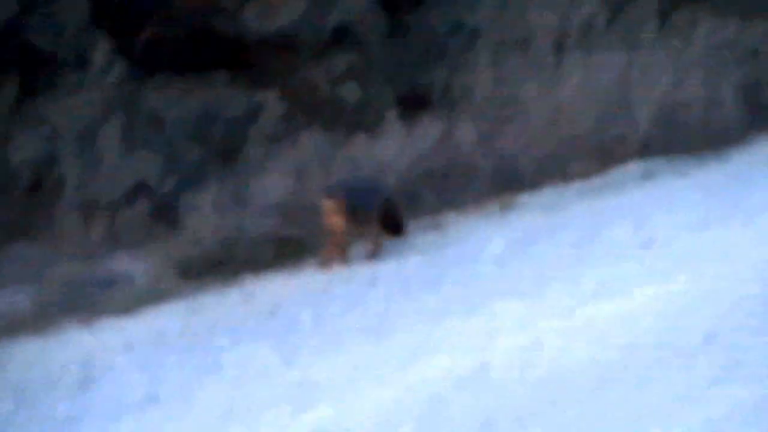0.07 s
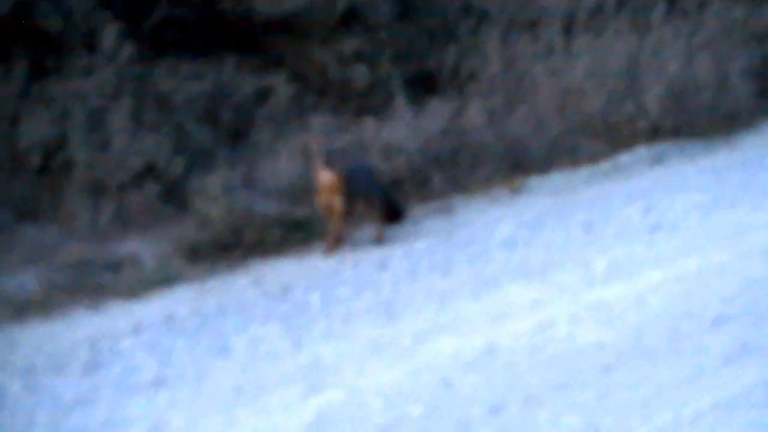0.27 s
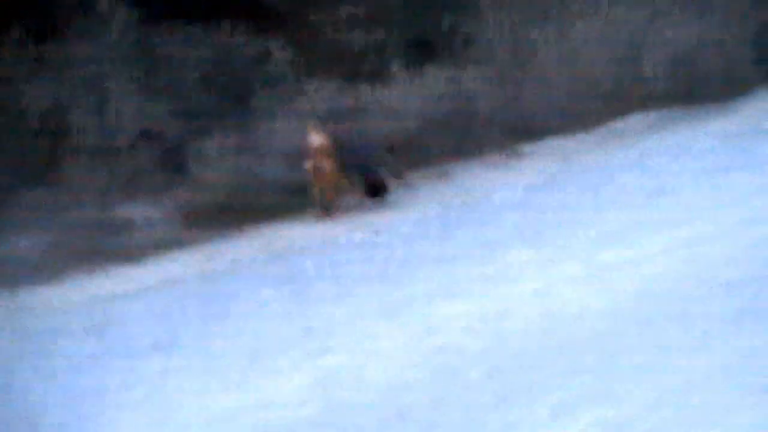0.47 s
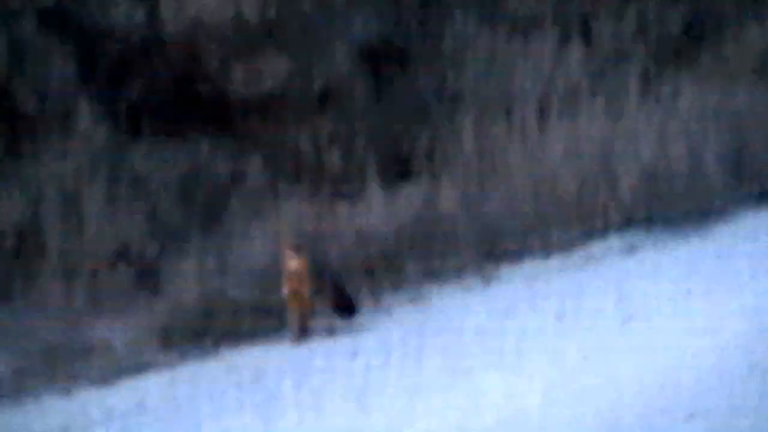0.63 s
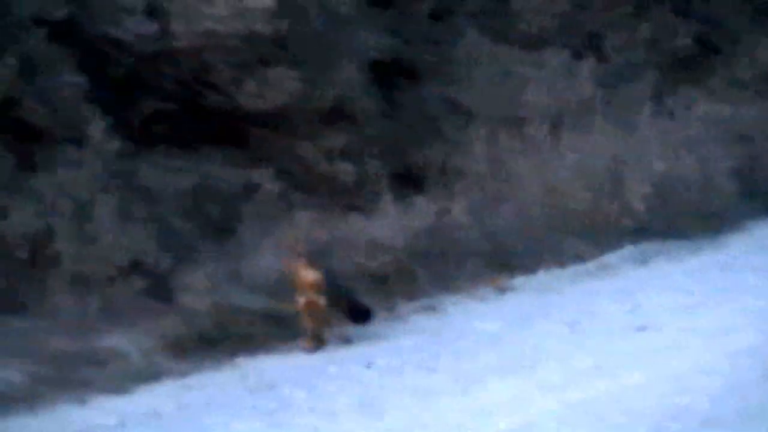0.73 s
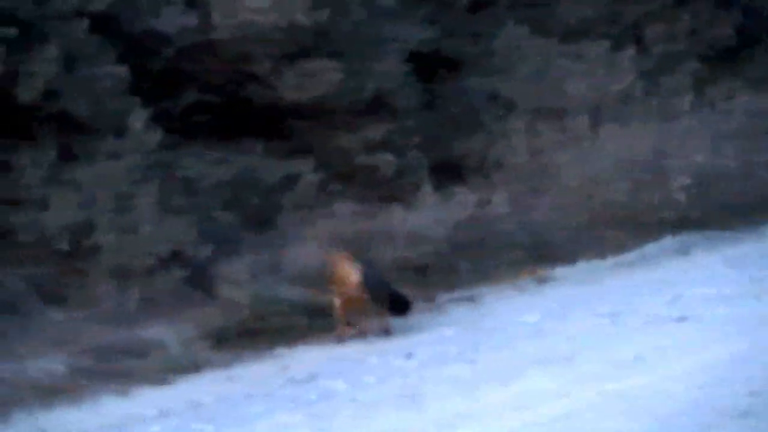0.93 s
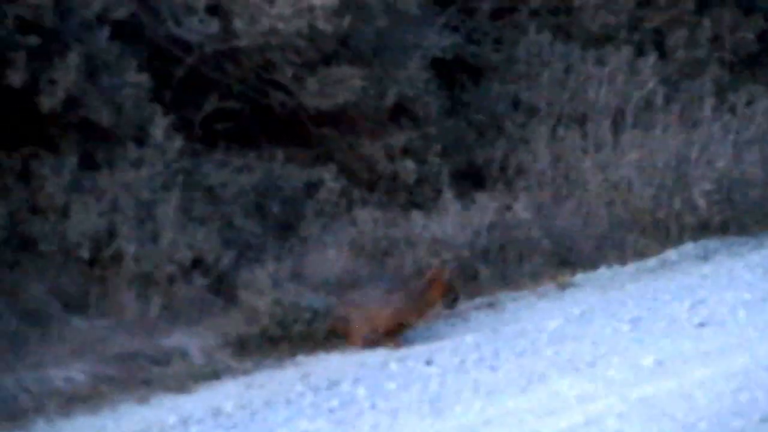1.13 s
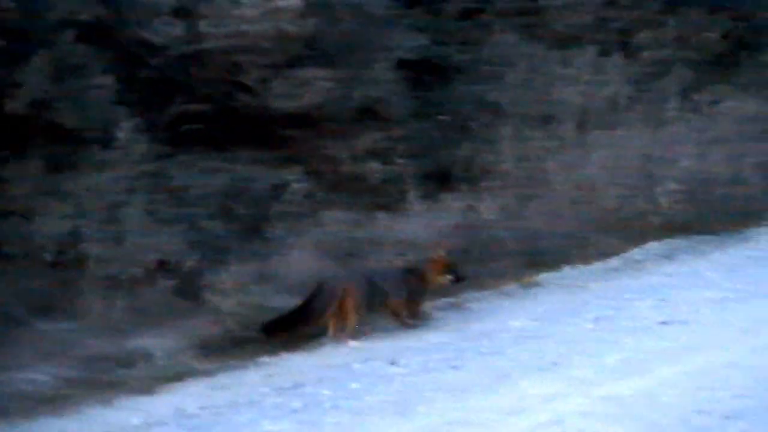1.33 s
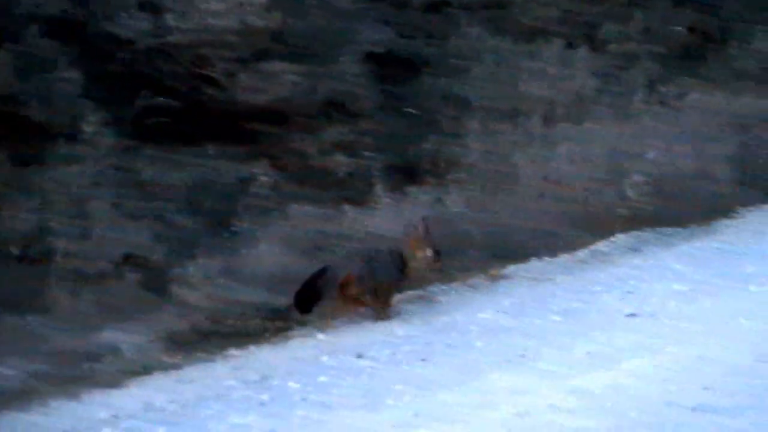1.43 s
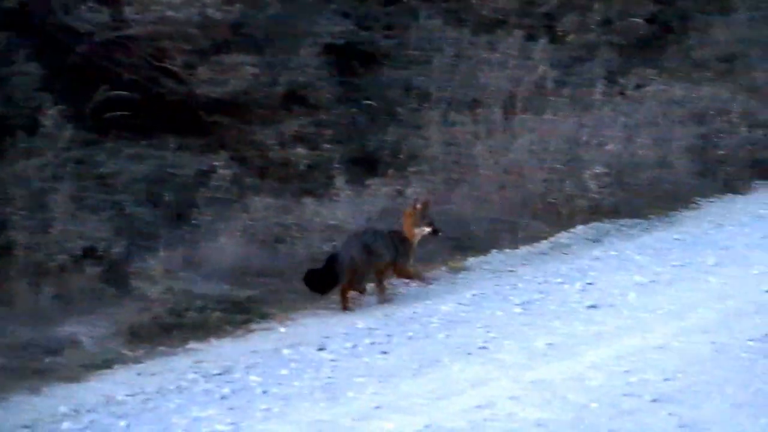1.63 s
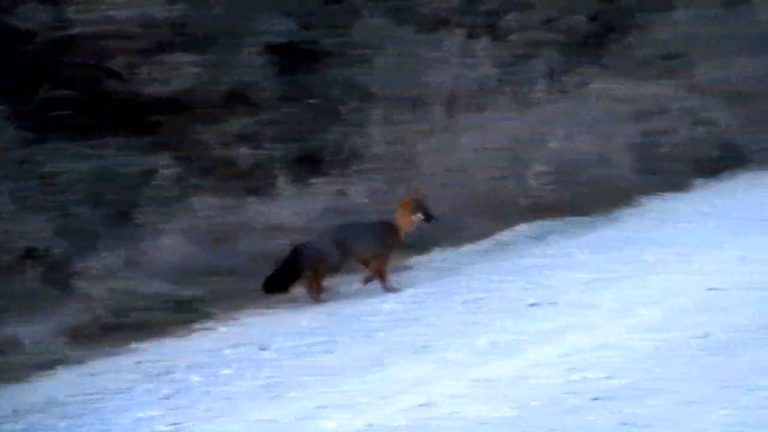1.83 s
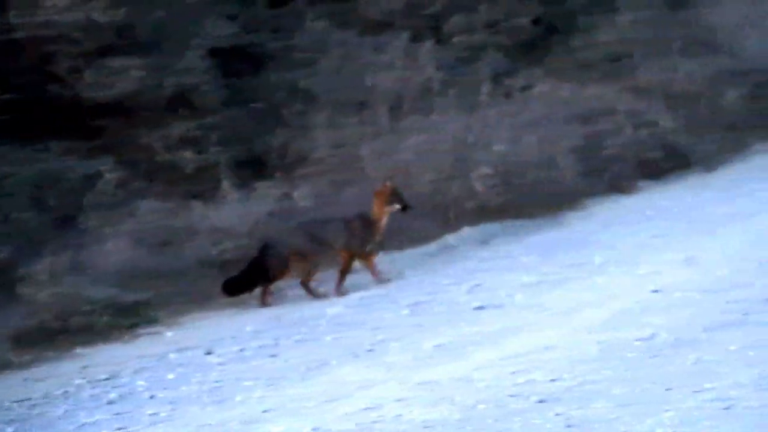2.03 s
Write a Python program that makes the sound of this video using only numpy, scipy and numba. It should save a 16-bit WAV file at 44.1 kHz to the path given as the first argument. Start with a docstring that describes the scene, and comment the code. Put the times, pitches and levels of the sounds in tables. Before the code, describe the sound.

A fox gives one hoarse bark, starting as a crackle at about 0.15 seconds and loudest from 0.25 to 0.45. It ends in a short falling whine near 0.5 seconds, while two soft bumps sound near the microphone. A faint echo fades among the trees. A tiny tick follows at 0.9 seconds and two more soft bumps at about 1.8. A quiet outdoor hiss runs throughout.

```python
"""Over a quiet hiss, a fox gives one hoarse bark at the edge of a snowy wood. It starts as a crackle,
then irregularly flapping vocal folds chop a rush of air, and the throat resonances rise and sink with
the jaw. Near 0.5 s a short falling whine ends it, while two soft bumps sound near the microphone.
The trees return a faint echo; a tiny tick follows at 0.9 s and two more soft bumps at 1.8 s."""
import sys
import numpy as np
from scipy import signal
from scipy.fft import rfft, irfft
from scipy.io import wavfile
from scipy.ndimage import uniform_filter1d, map_coordinates
from numba import njit

SR = 44100
rng = np.random.default_rng(int(sys.argv[2]) if len(sys.argv) > 2 else 0)


def persist_wave(psi):
    """Save psi, clipped to +-1, as 16-bit WAV."""
    counts = np.round(np.clip(psi, -1, 1) * 32767).astype(np.int16)
    wavfile.write(sys.argv[1], SR, np.atleast_2d(counts).T)


N = 92610
TIME_S = np.arange(N) / SR
BINS_HZ = np.fft.rfftfreq(N, 1 / SR)

# Each row: time in seconds, rasp gain in dB, extra treble gain in dB.
BARK_EFFORT = [(.08, -69, -16), (.135, -49.5, -33), (.175, -43, -25.5), (.203, -29.5, -17),
               (.236, -24, -10), (.246, -21, -2.5), (.253, -19.5, -0.5), (.28, -17, -0.5), (.305, -17.5, 0),
               (.345, -20.5, 1.5), (.375, -17.5, -3.5), (.405, -19, -3), (.435, -20.5, -3),
               (.455, -24, -4.5), (.492, -29.5, -1.5), (.513, -49.5, 7.5), (.55, -61, -11.5)]
# Each row: time in seconds, fold pitch in Hz, clear tone gain in dB.
VOCAL_FOLDS = [(.04, 134, -71), (.14, 167.8, -55), (.18, 226.8, -41), (.212, 255.7, -40.5),
               (.248, 298.2, -34), (.28, 306.9, -29), (.305, 311.8, -32.5), (.36, 330.5, -31.5),
               (.43, 329.8, -39), (.47, 284, -31.5), (.497, 273.4, -40), (.511, 273.4, -38.5),
               (.535, 263, -78)]
TREBLE_HZ = 2080
AIR_HZ, AIR_FADE_FROM_S, AIR_FADE_DB_PER_S = 7000, .435, 99


def fox():
    """One bark: a crackle, a rasp that swells and brightens with effort over a clear tone, a whine."""
    pitch_hz, effort_db = curve(VOCAL_FOLDS), curve(BARK_EFFORT)
    slaps = rasp(pitch_hz)
    hoarse = shelf(throat(slaps), TREBLE_HZ, curve(BARK_EFFORT, column=2))
    air_db = -AIR_FADE_DB_PER_S * np.maximum(TIME_S - AIR_FADE_FROM_S, 0)
    hoarse = shelf(hoarse, AIR_HZ, air_db)  # the highest hiss dies first
    tone = clear_tone(pitch_hz, effort_db) * undb(curve(VOCAL_FOLDS, column=2))
    voice = hoarse * undb(effort_db) + tone
    return voice * during(VOCAL_FOLDS) + crackle(slaps) + whine()


# Each row: time in seconds, slaps per fold cycle, air over slaps in dB, factor on throat widths.
FOLD_RATTLE = [(.225, .75, -2, 1.83), (.255, 1.05, -1.5, 1.25), (.34, 1.05, -2, 1.62), (.39, 1.0, 5, 1.12),
               (.45, 1.0, -6.5, 0.93)]
JITTER, SHIMMER_DB, PUFF_DECAY_CYCLES, SOFT_CLOSURE_HZ = .36, 2.5, 0.53, 9100


def rasp(pitch_hz):
    """Irregular slaps of the folds, each followed by a puff of turbulent air."""
    slap_hz = curve(FOLD_RATTLE) * pitch_hz * np.exp(JITTER * wander(400))
    cycles = np.cumsum(slap_hz) / SR
    count = cycles.astype(int)
    strength = undb(SHIMMER_DB * np.clip(rng.standard_normal(N // 10), -2, 2))[count]
    pulses = unit_rms(np.diff(count, prepend=0) * strength)
    slaps = butterworth(pulses, SOFT_CLOSURE_HZ, "low", order=1)
    puffs = np.exp(-(cycles % 1) / PUFF_DECAY_CYCLES) * strength * rng.standard_normal(N)
    return unit_rms(slaps + undb(curve(FOLD_RATTLE, column=2)) * unit_rms(puffs))


# Each row: time in seconds, jaw opening from 0 to 1.
JAW_OPENING = [(.15, 0.63), (.205, 0.6), (.235, 0.7), (.255, 1), (.295, 1), (.335, .79), (.375, 0.46),
               (.43, 0.29), (.47, 0.12), (.51, 0.07)]
# Each row: centre in Hz with jaw closed and open, base width in Hz, gain in dB closed and open.
FORMANTS = [(652, 1217, 144, 0.5, 3), (586, 767, 153, -26.5, -9.5), (1537, 1472, 65, -6, -2),
            (1735, 1810, 74, -3, -4), (2684, 2490, 130, -15, -13.5), (2700, 4073, 300, -7.5, -8),
            (3810, 4620, 237, -11.5, -3.5), (5664, 6150, 190, -2, -19), (5480, 5030, 420, -21, -6.5),
            (6500, 7700, 560, -15.5, -27), (7150, 8310, 1090, -21, -25)]
# Each row: notch in Hz with jaw closed and open, width in Hz, depth from 0 to 1.
SIDE_CAVITIES = [(2300, 2250, 700, 0.42), (4780, 4960, 480, .6)]
THROAT_LOW_HZ, THROAT_HIGH_HZ = 472, 9120


def throat(slaps):
    """Resonances and side-cavity notches slide with the jaw; slack folds broaden the resonances."""
    jaw, broadening = curve(JAW_OPENING), np.maximum(curve(FOLD_RATTLE, column=3), .3)
    voice = 0
    for closed_hz, open_hz, width_hz, closed_db, open_db in FORMANTS:
        hz = closed_hz + (open_hz - closed_hz) * jaw
        ring = resonate(slaps, hz, broadening * width_hz)
        ring = resonate(ring, hz, 2.4 * width_hz)
        voice = voice + ring * undb(closed_db + (open_db - closed_db) * jaw)
    for closed_hz, open_hz, width_hz, depth in SIDE_CAVITIES:
        hz = closed_hz + (open_hz - closed_hz) * jaw
        voice = voice - depth * resonate(voice, hz, width_hz)
    voice = butterworth(voice, THROAT_LOW_HZ, "high", order=9)
    voice = butterworth(voice, THROAT_HIGH_HZ, "low", order=10)
    return voice / np.sqrt(uniform_filter1d(voice ** 2, size=700))  # hold the level steady


# Each entry: gain of one harmonic in dB, from the fundamental up.
TONE_HARMONICS_DB = [0.5, 2.5, -4, -7.5]
# Each row: frequency in Hz, throat gain in dB.
TONE_RESPONSE = [(150, 5), (280, -24.5), (530, -2), (640, -0.5), (1400, 0.5)]
SOFT_WAVER, STRAIN_WAVER, FLICKER_DB = 0.0041, 0.019, 2.0


def clear_tone(pitch_hz, effort_db):
    """The regular part of the folds' motion: a few harmonics that roughen under strain."""
    waver = SOFT_WAVER + STRAIN_WAVER * undb(effort_db - effort_db.max())
    phase = 2 * np.pi * np.cumsum(pitch_hz * (1 + waver * wander(300))) / SR
    tone = 0
    for k, db in enumerate(TONE_HARMONICS_DB, 1):
        throat_db = np.interp(k * pitch_hz, *np.array(TONE_RESPONSE).T)
        tone = tone + np.sin(k * phase) * undb(db + throat_db + FLICKER_DB * wander(111.34))
    return tone


# Each row: time in seconds, level in dB.
CRACKLE_ENVELOPE = [(.13, -81), (.203, -41.5), (.232, -42), (.245, -41.5), (.32, -35), (.37, -57),
                    (.42, -84)]
# Each row: frequency in Hz, relative gain in dB.
CRACKLE_RESPONSE = [(1500, -26), (2900, -35), (3900, -12), (5800, 1.5), (6700, -14.5), (8400, -14.5),
                    (9800, -45), (13000, -46)]


def crackle(slaps):
    """Dry treble of the slaps that leaves the mouth without ringing the throat."""
    bright = irfft(rfft(slaps) * undb(by_frequency(CRACKLE_RESPONSE)), N)
    return unit_rms(bright) * undb(curve(CRACKLE_ENVELOPE)) * during(CRACKLE_ENVELOPE)


# Each row: time in seconds, pitch in Hz, level in dB.
WHINE_GLIDE = [(.475, 1150, -65), (.5, 1107, -35.5), (.512, 950, -33.5), (.528, 933, -39.5),
               (.55, 890, -69)]


def whine():
    """A pure falling note as the rasp gives out."""
    phase = 2 * np.pi * np.cumsum(curve(WHINE_GLIDE)) / SR
    return np.sin(phase) * undb(curve(WHINE_GLIDE, column=2)) * during(WHINE_GLIDE)


# Each row: frequency in Hz, left minus right in dB.
BARK_BALANCE = [(300, -3), (540, 1), (850, -1.5), (1020, -0.5), (1270, 5), (1500, -4), (2600, -7),
                (3250, -4.5), (3650, -9.5), (4200, -5.5), (6000, -5.5), (7500, -10), (9200, -0.5)]
# Each row: frequency in Hz, phase lead of the left in radians.
BARK_LEAD = [(300, -0.34), (1150, 0), (1330, -1), (2000, -0.31), (3000, 0.39), (7200, -0.32), (8300, 1),
             (9500, 0.00059)]


def arrival(bark):
    """The bark reaches the two microphone ports with unequal level and phase."""
    lead = np.exp(.5j * np.array([[1], [-1]]) * by_frequency(BARK_LEAD))
    return irfft(rfft(bark) * pan(by_frequency(BARK_BALANCE)) * lead, N)


# Each row: frequency in Hz, echo gain in dB.
TREE_RESPONSE = [(150, -48), (300, -1), (600, -21.5), (1400, -20.5), (1750, -16), (2600, -19.5),
                 (4400, -41), (7500, -19.5), (12000, -65)]
# Each row: centre in Hz, T60 in seconds, width in Hz, gain in dB.
LINGERING_RINGS = [(3950, 1.97, 132, -17.5)]
ECHO_T60_S, ECHO_DELAY_S = 0.94, 0.038
SCATTER_DB, SCATTER_T60_S, SCATTER_DELAY_S = -24, 0.053, 0.0059


def wood(bark):
    """Echo of the trees, scatter from nearby ground and brush, and a thin lingering ring."""
    trees = reflections(bark, ECHO_T60_S, ECHO_DELAY_S)
    echo = irfft(rfft(trees) * undb(by_frequency(TREE_RESPONSE)), N)
    echo += undb(SCATTER_DB) * reflections(bark, SCATTER_T60_S, SCATTER_DELAY_S)
    for hz, t60_s, width_hz, db in LINGERING_RINGS:
        tail = reflections(bark, t60_s, ECHO_DELAY_S)
        echo += undb(db) * butterworth(tail, [hz - width_hz / 2, hz + width_hz / 2], "band")
    return echo


def reflections(x, t60_s, delay_s):
    """A dense, fading train of reflections, different in each ear."""
    decay = np.exp(-np.log(1000) * TIME_S / t60_s) * (TIME_S > delay_s)
    tail = unit_rms(rng.standard_normal((2, N)) * decay) / np.sqrt(N)
    return signal.fftconvolve(x, tail, axes=1)[:, :N]


# Each row: start in seconds, peak before panning in dB, centre in Hz, width in Hz, left minus right in dB.
NEAR_KNOCKS = [(0.425, -36.5, 192, 124, -4.5), (.507, -42, 223, 80, 19), (.8978, -39, 7060, 3320, -21),
               (1.8355, -42, 650, 218, -11.5), (1.848, -50, 603, 500, -22)]


def knocks():
    """Bumps and a tick near the microphone: single taps into heavily damped resonances."""
    taps = 0
    for start_s, db, hz, width_hz, pan_db in NEAR_KNOCKS:
        impulse = signal.unit_impulse(N, int(start_s * SR))
        centre_hz = np.full(N, float(hz))
        ring = resonate(resonate(impulse, centre_hz, width_hz), centre_hz, width_hz)
        taps = taps + pan(pan_db) * undb(db) * ring / np.abs(ring).max()
    return taps


# Each row: frequency in Hz, relative spectral density in dB.
HISS_SPECTRUM = [(15, -57), (25, -33), (48, -9.5), (100, -10), (274, -2), (389, -3.5), (666, -8),
                 (970, -13.5), (1660, -14.5), (2300, -20.5), (3260, -21), (3630, -19.5), (7500, -26),
                 (15500, -36)]
# Each row: frequency in Hz, left-right coherence from 0 to 1.
HISS_COHERENCE = [(30, 0.63), (80, 0.85), (180, 0.48), (350, 0.086), (700, 0.52), (2000, 0.033),
                  (12000, 0.037)]
# Each row: frequency in Hz, left minus right in dB.
HISS_BALANCE = [(60, -1.5), (400, -3), (2400, -2.5), (4400, -5), (15000, -2)]
HISS_DB, HISS_FADE_DB_PER_S, HISS_WANDER_HZ, HISS_WANDER_DB = -50.5, 1.35, 6, .3
WHISTLE_HZ, WHISTLE_WIDTH_HZ, WHISTLE_BOOST_DB = 7300, 210, 5


def hiss():
    """Quiet, wide noise that slowly sinks, with one thin band standing out."""
    mid, side = rfft(rng.standard_normal((2, N)))
    coherence = by_frequency(HISS_COHERENCE)
    pair = mid * np.sqrt(1 + coherence) + np.array([[1], [-1]]) * side * np.sqrt(1 - coherence)
    whistle_db = WHISTLE_BOOST_DB * np.exp(-((BINS_HZ - WHISTLE_HZ) / WHISTLE_WIDTH_HZ) ** 2)
    colour = undb(by_frequency(HISS_SPECTRUM) + whistle_db) * pan(by_frequency(HISS_BALANCE))
    noise = unit_rms(irfft(pair * colour, N))
    level_db = HISS_DB - HISS_FADE_DB_PER_S * (TIME_S - N / SR / 2)
    return noise * undb(level_db + HISS_WANDER_DB * wander(HISS_WANDER_HZ))


def undb(db):
    """Decibels to gain."""
    return 10 ** (np.asarray(db) / 20)


def unit_rms(x):
    """Scale to rms 1."""
    return x / np.sqrt(np.mean(x ** 2))


def curve(table, column=1):
    """One column of a time table at every sample."""
    rows = np.array(table)
    return np.interp(TIME_S, rows[:, 0], rows[:, column])


def during(table):
    """1 between a table's first and last time, else 0."""
    return (TIME_S > table[0][0]) * (TIME_S < table[-1][0])


def by_frequency(table):
    """A frequency table at every spectral bin."""
    rows = np.array(table)
    return np.interp(np.log(np.maximum(BINS_HZ, 1)), np.log(rows[:, 0]), rows[:, 1])


def pan(db):
    """Left and right gains for a level difference."""
    return undb(np.array([[1], [-1]]) * db / 2)


def wander(hz):
    """Smooth random motion, rms 1."""
    return unit_rms(map_coordinates(rng.standard_normal(N // 10), [TIME_S * hz], mode="wrap"))


def butterworth(x, hz, kind, order=2):
    """Causal low-, high- or band-pass."""
    return signal.sosfilt(signal.butter(order, hz, kind, fs=SR, output="sos"), x)


def shelf(x, hz, db):
    """Raise or lower everything above a frequency."""
    low = signal.sosfiltfilt(signal.butter(4, hz, fs=SR, output="sos"), x)
    return low + (x - low) * undb(db)


@njit
def resonate(x, hz, width_hz):
    """State-variable band-pass with a moving centre, gain 1 at the peak."""
    y, band_state, low_state = np.empty(len(x)), 0., 0.
    damping = width_hz / hz
    for i in range(len(x)):
        g, k = np.tan(np.pi * hz[i] / SR), damping[i]
        band = (band_state + g * (x[i] + 1e-18 - low_state)) / (1 + g * (g + k))
        band_state = 2 * band - band_state
        low_state += 2 * g * band
        y[i] = k * band
    return y


def scene():
    """The bark in stereo with its echo, the hiss and the knocks."""
    bark = arrival(fox())
    return bark + wood(bark) + hiss() + knocks()


def record(dry, top_hz=15500):
    """A steep low-pass cuts the top."""
    return signal.sosfilt(signal.ellip(10, .2, 80, top_hz, fs=SR, output="sos"), dry)


dry = scene()
out = record(dry)
persist_wave(out)
```